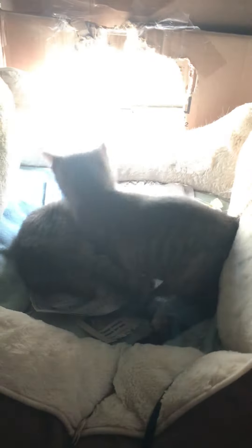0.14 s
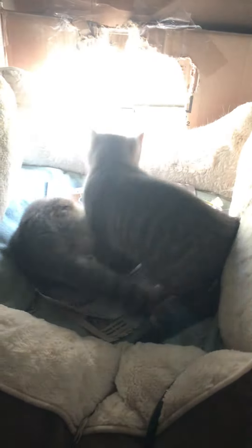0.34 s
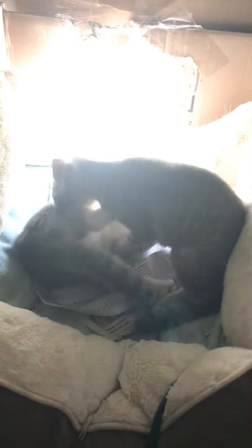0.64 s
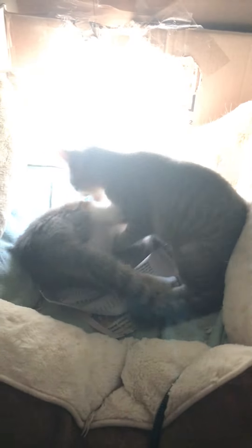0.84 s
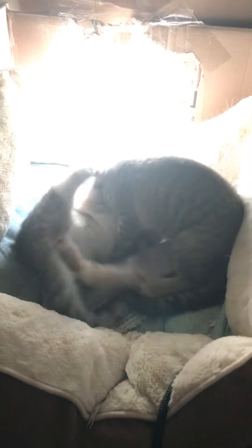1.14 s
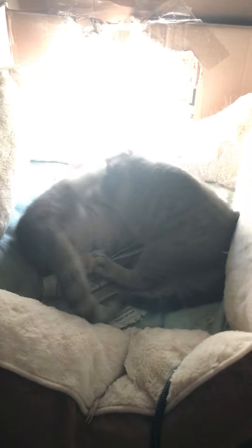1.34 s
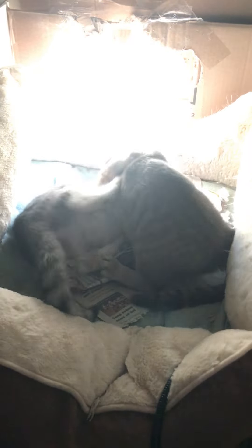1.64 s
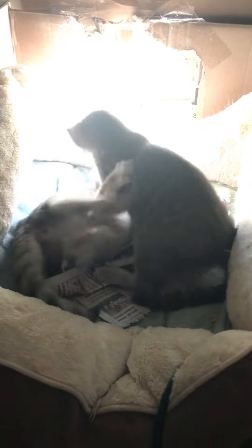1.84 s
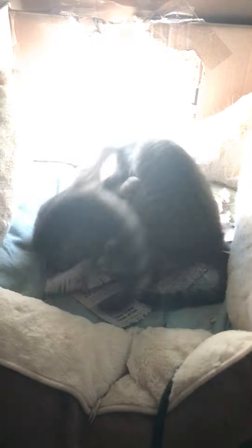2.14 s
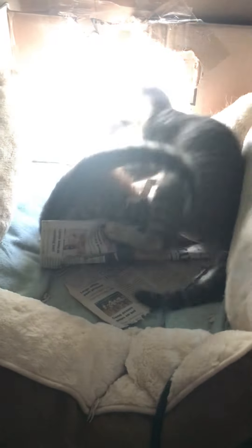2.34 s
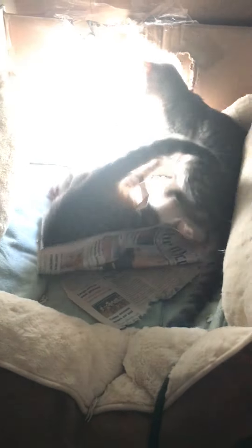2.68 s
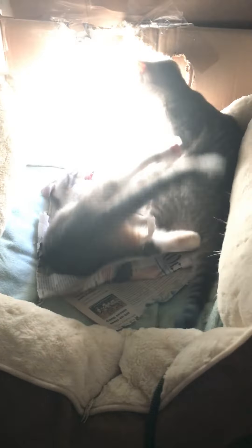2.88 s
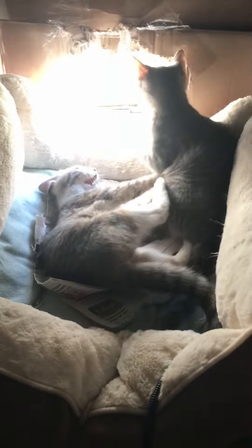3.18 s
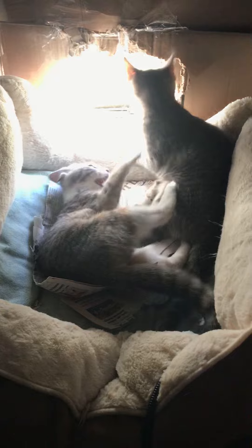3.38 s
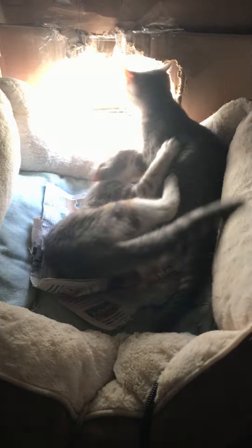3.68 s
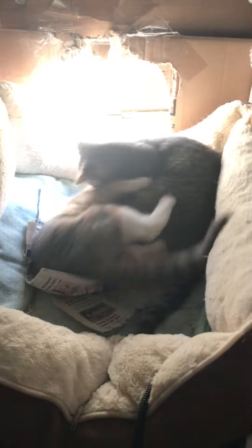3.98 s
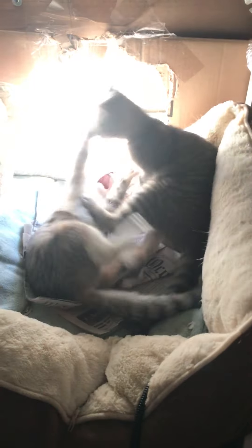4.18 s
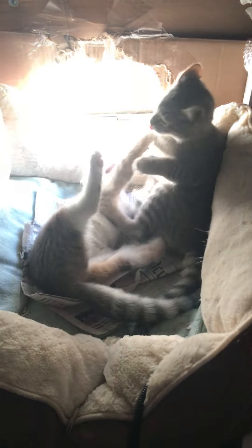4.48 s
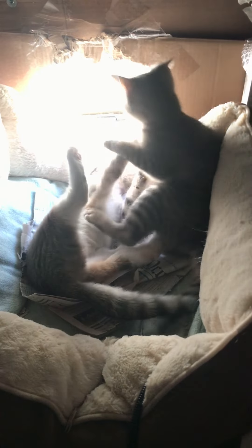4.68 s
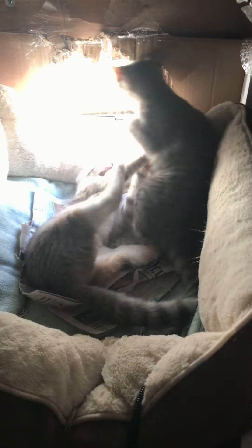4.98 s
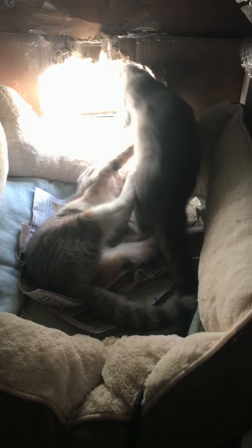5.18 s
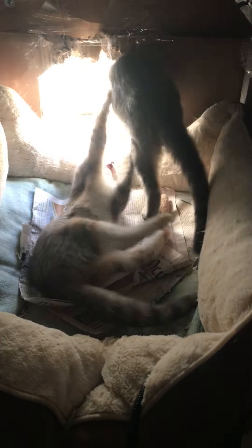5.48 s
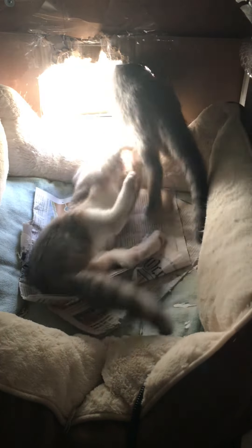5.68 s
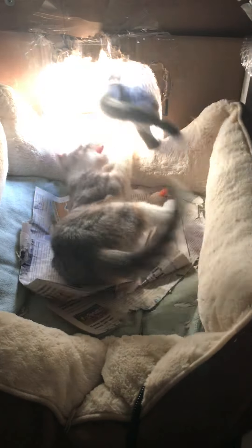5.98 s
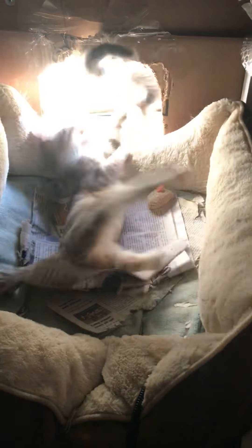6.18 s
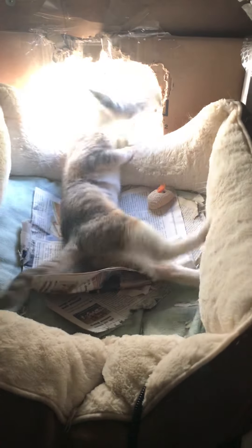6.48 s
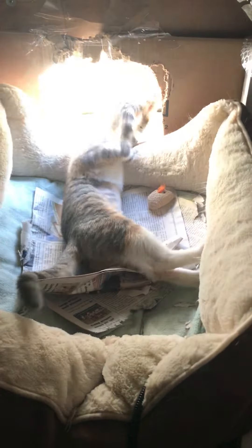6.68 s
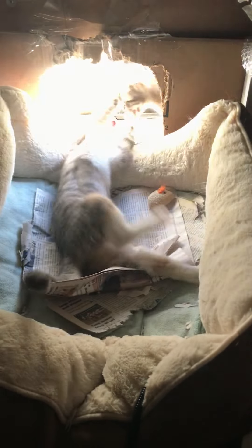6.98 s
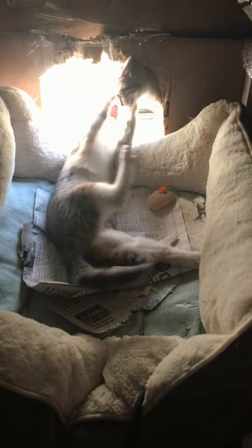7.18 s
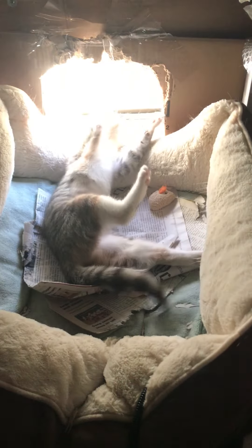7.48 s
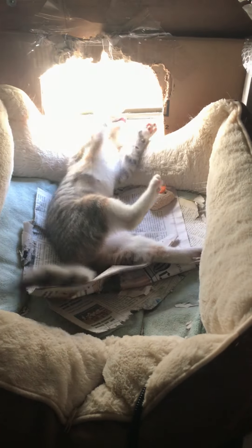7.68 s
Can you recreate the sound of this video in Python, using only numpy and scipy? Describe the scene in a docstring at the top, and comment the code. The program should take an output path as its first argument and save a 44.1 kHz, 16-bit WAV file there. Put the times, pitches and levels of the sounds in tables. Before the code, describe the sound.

Two kittens wrestle on newspaper in a padded cardboard box, sounding close and dry over a faint, steady low machine hum. From the start, paper rustles and fur brushes in uneven bursts with small claw snaps, and a soft thump comes near 1 second. From about 1.1 to 2 seconds one kitten gives a single hoarse, wavering yowl that climbs in pitch and grows brighter toward its end. Sharp paper snaps cluster around it, the loudest at about 2.1 seconds, with another strong one near 3. Lighter scuffling continues, easing around 4.5 seconds, with a soft bump at 4.8 and a snap just after 5. A brisk flurry of rubbing and crackling peaks around 6.2 seconds. From 6.4 to 7.6 seconds come several dull thumps and knocks on the cardboard, amid fading rustles.

```python
"""Paper rustles and snaps over a low hum: two kittens wrestle on newspaper in a padded bed inside a
cardboard box. One gives a hoarse yowl about a second in, its throat and mouth boosting a stack of tones.
Fur and paper rub in thousands of tiny clicks, claws set the sheet ringing in short snaps, and bodies
thump the cardboard, mostly near the end. A machine hums somewhere in the house throughout."""
import sys
import numpy as np
from scipy import signal
from scipy.fft import rfft, irfft, next_fast_len
from scipy.io import wavfile

SR = 44100
rng = np.random.default_rng(int(sys.argv[2]) if len(sys.argv) > 2 else 0)


def wrap_up_sound(samples):
    """Save the sound to the file named by the first command line argument, as 16-bit audio."""
    columns = np.atleast_2d(samples).T
    # keep every value between -1 and 1, then stretch to whole-number steps
    tamed = np.clip(columns, -1, 1)
    steps = np.round(tamed * 32767).astype(np.int16)
    wavfile.write(sys.argv[1], SR, steps)


N = 345303

# Tone colour of the room's rumble, of rubbed paper and of rubbed fur: pitch_hz, relative_db
ROOM_COLOUR = [(18, -30), (30, -32), (64, -3), (124, -2.5), (179, -13.5), (210, -12), (245, -6.5),
               (426, -18), (1190, -21), (1280, -25.5), (1590, -26), (2290, -34), (16000, -44.5)]
PAPER_COLOUR = [(450, -13), (900, 7.5), (1300, 4.5), (2200, 0), (3500, -5), (5000, -26), (8000, -56),
                (16000, -16.5)]
FUR_COLOUR = [(1500, -5.5), (3000, -0.5), (6300, 0), (8700, -1), (12500, -1), (15500, -5)]
# Tones of the machine: pitch_hz, width_hz, level_db
HUM_TONES = [(81.7, 100, -61), (118.9, 7.8, -60), (179.1, 18.5, -65), (238.7, 7.8, -66), (590.6, 35, -72),
             (996, 7.8, -78)]
# Bodies sliding on paper and plush: peak_s, length_s, paper_db, fur_db
SCUFFLE_MOVES = [(0.1, 0.066, -59, -61), (0.171, .03, -53.5, -61.5), (0.242, 0.065, -62, -65.5),
                 (0.344, 0.041, -55, -60.5), (0.528, 0.15, -67, -68), (.65, 0.098, -66, -67),
                 (0.735, 0.057, -61, -64), (0.986, 0.037, -57, -78), (1.042, 0.041, -58.5, -70),
                 (1.195, 0.05, -49.5, -54), (1.308, 0.17, -54, -56), (1.585, 0.12, -58, -62),
                 (1.834, 0.016, -58, -46), (1.909, 0.15, -51, -54), (2.061, 0.058, -50, -51),
                 (2.182, 0.077, -54, -55), (2.28, 0.48, -58, -58.5), (2.478, 0.25, -57, -55),
                 (2.676, 0.087, -57.5, -57), (2.778, 0.037, -64, -61), (2.881, 0.067, -55.5, -57.5),
                 (2.967, 0.11, -56.5, -62), (3.062, .12, -59.5, -59), (3.47, 0.3, -65.5, -70),
                 (3.735, 0.16, -64.5, -67), (3.934, .07, -54.5, -55), (4.052, 0.063, -59.5, -54),
                 (4.106, 0.085, -55, -56), (4.234, 0.18, -67, -63), (4.4, 0.11, -79, -63),
                 (4.891, 0.064, -80, -62.5), (5.051, 0.012, -71, -51.5), (5.19, 0.064, -60.5, -55),
                 (5.378, 0.16, -66.5, -59.5), (5.49, 0.22, -81, -64), (5.601, 0.08, -60, -62.5),
                 (5.85, 0.11, -61.5, -57), (5.933, 0.095, -65, -58), (6.089, 0.053, -58.5, -52.5),
                 (6.174, .04, -48.5, -49), (6.201, 0.037, -44.5, -40.5), (6.251, 0.046, -49.5, -41.5),
                 (6.438, 0.065, -66, -58.5), (6.813, 0.15, -62, -63), (6.535, 0.075, -77, -65),
                 (6.665, 0.042, -79, -67), (6.991, 0.099, -62, -64.5), (7.076, .08, -64.5, -62),
                 (7.196, 0.11, -72, -62.5), (7.316, 0.13, -68, -63.5), (7.446, 0.077, -63, -60.5),
                 (7.522, 0.037, -83, -62.5), (7.735, .1, -82, -70)]
# Tones the cardboard and the paper ring at: pitch_hz, relative_db, ring_s (time to fade by 60 dB)
CARDBOARD_TONES = [(60, 0, 0.38), (108, 7, 0.1), (164, -3.5, 0.12), (226, 7, 0.13), (302, 15, 0.044),
                   (430, 9.5, 0.11), (615, -18, 0.033)]
SHEET_TONES = [(606, -6.5, 0.017), (1228, -15.5, 0.034), (1500, -5.5, 0.0047), (2430, -13.5, 0.0077),
               (2810, 1, 0.0027), (4020, -0.5, 0.0033), (5770, 7.5, 0.00075), (8740, -1.5, 0.0013),
               (11450, 3, 0.0016), (14300, -33, 0.0027)]
# Blows on the cardboard: start_s, peak_db, boom_db (low tones), knock_db (high tones), length_ms
THUMP_HITS = [(0.971, -44, -20, -5.5, 0.99), (4.798, -44, -8, -1, 1.8), (6.416, -40.5, -1, -12, 0.85),
              (6.448, -38.5, 3.5, -13, 0.46), (6.752, -30.5, -13, -22, 2.7), (6.802, -32.5, -1, -0.5, 1.3),
              (6.997, -35, -9, -5.5, 0.84), (7.068, -41, 1, -7, 1.3), (7.239, -44.5, -7, -5, 0.44),
              (7.279, -41, -1, -10, 3.5), (7.415, -39.5, -9, -7, 0.32), (7.64, -35, -34, -4, 5.7)]
# Snaps of claws and paper: start_s, peak_db, dull_db (low tones), treble_db (high tones)
SNAP_HITS = [(0.1487, -43, 26, -23), (.1735, -36, 15, -22), (0.2236, -39.5, 5, -20), (.2443, -34, 11, -43),
             (0.3116, -44, 12, -24), (0.3516, -32.5, 13, -38), (0.366, -40.5, 8, -24), (.541, -45, 12, -24),
             (.719, -37, 9, -26), (1.0275, -34, -6, -23), (1.1695, -36, 6, -20), (1.228, -36, -13, -33),
             (1.2494, -30, -11, -42), (1.282, -29, 8, -19), (1.296, -28, 18, -29), (1.3249, -28.5, -23, 10),
             (1.8848, -26, -14, 3), (1.8981, -16, -1.5, -42), (2.0546, -27.5, 16.5, 4),
             (2.0727, -32, -4, -13), (2.0857, -23, -13, -29), (2.1495, -5, 8, 12.5), (2.1624, -33, 17, -19),
             (2.2157, -34, 31, -14), (2.2754, -38.5, 27, -23), (2.318, -35.5, -2, -7),
             (2.3412, -39, 17, -23), (2.5504, -42.5, -24, -16), (2.6791, -40.5, -11, -45),
             (2.7182, -40.5, -1, -45), (2.811, -39.5, 7, -53), (2.945, -34, 3, -27),
             (2.9502, -11.5, -2, -29), (3.045, -40, 6, -34), (3.073, -28, 11.5, -21),
             (3.3128, -38, 13.5, -40), (3.441, -38.5, 5, -45), (3.7231, -32.5, -22, -28),
             (3.959, -39, -23, -26), (4.0874, -37, 2, -28), (4.1404, -30, -41, -27), (4.1644, -34, 15, -35),
             (5.0602, -30.5, 16.5, 9.5), (5.142, -42, 2, -26), (5.364, -37.5, 3, -9),
             (5.4037, -35, -23, -20), (5.721, -43.5, 14, -21), (5.768, -40.5, -17, -26),
             (5.807, -33, 4, -60), (5.8303, -33.5, -32, -54), (5.9716, -32.5, 13, -25),
             (6.0083, -42, 19, -27), (6.0846, -33, -26, -8), (6.096, -21.5, -39, -22),
             (6.2076, -15.5, -22, 5), (6.2377, -22, -30, -9), (6.25, -15.5, -36, -17),
             (6.2734, -33, 17.5, -4), (6.346, -34.5, -26, 7), (7.3639, -40, -12, -30),
             (7.4532, -37, -18, 32)]
# Path of the voice: time_s, pitch_hz, chest_db, mouth_db, throat_db, throat_hz
YOWL_PATH = [(1.07, 322, -75, -64, -76, 2390), (1.09, 351.3, -47, -76, -93, 2380),
             (1.114, 337.5, -47.5, -64, -79.5, 2380), (1.132, 343.3, -55, -81, -92, 2230),
             (1.158, 391.7, -61, -59.5, -68, 2300), (1.19, 362, -46, -59, -65, 2230),
             (1.248, 385.8, -56, -57.5, -57, 2470), (1.264, 423, -65, -65, -65, 2470),
             (1.3, 416, -55, -51, -52, 2470), (1.324, 468, -62, -59, -52, 2570),
             (1.432, 467.4, -60, -57, -51, 2660), (1.49, 513, -56, -51.5, -53.5, 2600),
             (1.538, 462, -54, -55.5, -50, 2730), (1.58, 394.3, -43, -51, -54.5, 2350),
             (1.628, 425.6, -56, -62, -68, 2280), (1.656, 428.4, -59, -58, -62, 2300),
             (1.68, 467.5, -54, -55, -60, 2350), (1.718, 413, -47, -48.5, -65, 2050),
             (1.758, 443, -58, -54, -62, 2104), (1.818, 463, -58, -42.5, -32.5, 2690),
             (1.87, 443, -68, -49, -42, 2620), (1.894, 464, -58, -46, -37, 2350),
             (1.93, 475, -69, -56, -39, 2270), (1.982, 423.3, -59, -48, -57, 2280),
             (2.0, 447, -59, -60, -60, 2236), (2.02, 438, -61, -51, -60, 2310)]
# Roughness of the voice: time_s, hoarseness (0 to 1)
HOARSENESS = [(1.07, .3), (1.13, .4), (1.17, .9), (1.29, .8), (1.33, .3), (1.56, .3), (1.66, .45),
              (1.75, .2), (1.95, .2), (2.02, .6)]
# Pitches the microphone port weakens: pitch_hz, width_hz, share_removed (0 to 1)
PORT_DIPS = [(4880, 410, 0.36), (7700, 200, 0.26), (10420, 1000, 0.44)]


def from_db(db):
    """Turn decibels into a number to multiply by."""
    return 10 ** (np.asarray(db) / 20)


def rms_one(x):
    """Scale a sound so its average strength (rms) is 1."""
    return x / np.sqrt(np.mean(x ** 2) + 1e-20)


def in_time(rows):
    """Turn rows that start with a time into curves, one value a sample."""
    times_s, *columns = np.transpose(rows)
    return [np.interp(np.arange(N) / SR, times_s, column) for column in columns]


def coloured(x, colour):
    """Give a sound a tone colour, at strength 1."""
    size = next_fast_len(N)
    hz, db = np.transpose(colour)
    log_hz = np.log(np.arange(size // 2 + 1) * SR / size + 1)
    gains = from_db(np.interp(log_hz, np.log(hz), db))
    return rms_one(irfft(rfft(x, size) * gains, size)[:N])


def drift(rate_hz, size=N):
    """A smooth random wobble of strength 1."""
    r = np.exp(-2 * np.pi * rate_hz / SR)
    noise = rng.standard_normal(size + SR // 4)
    return rms_one(signal.lfilter([1], [1, -2 * r, r * r], noise)[SR // 4:])


def ring(force, hz, ring_s):
    """Each push starts a pure tone that dies away."""
    decay, turn = from_db(-60 / (ring_s * SR)), 2 * np.pi * hz / SR
    return signal.lfilter([0, np.sin(turn)], [1, -2 * decay * np.cos(turn), decay ** 2], force + 1e-18)


def add(out, start_s, peak_db, blow):
    """Mix in one blow at its time and peak level."""
    at = round(start_s * SR)
    out[at:at + len(blow)] += (from_db(peak_db) * blow / np.abs(blow).max())[:N - at]


def room_rumble(level_db=-57):
    """The steady low noise of the house."""
    return from_db(level_db) * coloured(rng.standard_normal(N), ROOM_COLOUR)


def machine_hum():
    """A machine holds a few tones, each blurred by a random waver."""
    out, t = 0, np.arange(N) / SR
    for hz, width_hz, db in HUM_TONES:
        waver = 1 + drift(width_hz) + 1j * drift(width_hz)
        out = out + from_db(db) * rms_one(np.real(waver * np.exp(2j * np.pi * hz * t)))
    return out


def box_echo(x, ring_s=0.068, level_db=-14.5):
    """Close padded walls give a short, dull tail of echoes."""
    t = np.arange(round(.2 * SR)) / SR
    dull_noise = signal.lfilter([1], [1, -.6], rng.standard_normal(len(t)))
    tail = dull_noise * from_db(-60 * t / ring_s) * (t > .003)
    return from_db(level_db) * signal.fftconvolve(x, tail / np.sqrt(np.sum(tail ** 2)))[:N]


def scuffle_levels(fade_db=11, rest_paper_db=-74, rest_fur_db=-103):
    """Each scuffle swells and fades; the loudest leads, with faint stirring in between."""
    t = np.arange(0, N / SR + .002, .002)
    peak_s, length_s, paper_db, fur_db = np.transpose(SCUFFLE_MOVES)[:, :, None]
    drop_db = fade_db * (np.abs(t - peak_s) / length_s) ** 0.97
    paper = np.maximum((paper_db - drop_db).max(axis=0), rest_paper_db)
    fur = np.maximum((fur_db - drop_db).max(axis=0), rest_fur_db)
    return in_time(np.transpose([t, paper, fur]))


def grains(per_s, spread_db, clump_db):
    """Tiny random clicks of uneven size that come in clumps."""
    sizes = from_db(spread_db * np.minimum(rng.exponential(1, N), 5)) * rng.choice([-1, 1], N)
    return sizes * (rng.random(N) < per_s / SR) * from_db(clump_db * drift(34))


def patchy(x, count, swing_db, low_hz, high_hz):
    """Pitch ranges swell and fade separately, as different hairs and folds rub."""
    edges = np.geomspace(low_hz, high_hz, count + 1)
    bands = [signal.butter(1, pair, "band", fs=SR, output="sos") for pair in zip(edges, edges[1:])]
    return sum(from_db(swing_db * drift(27)) * signal.sosfilt(band, x) for band in bands)


def crinkles(paper_db):
    """Small creases pop, more often when the paper moves; each rings one tone of the sheet."""
    per_s = 60 * np.clip((paper_db + 76) / 15, 0, 1.5)
    pops = rng.standard_normal(N) * (rng.random(N) < per_s / SR)
    chosen = rng.integers(0, len(SHEET_TONES), N)
    ringing = sum(from_db(db) * ring(pops * (chosen == k), hz, ring_s / 2)
                  for k, (hz, db, ring_s) in enumerate(SHEET_TONES))
    return from_db(np.minimum(paper_db, -58) + 11.5) * ringing


def rubbing():
    """Paper crackles in coarse grains; fur brushes the plush in fine ones."""
    paper_db, fur_db = scuffle_levels()
    paper = coloured(grains(per_s=4000, spread_db=2, clump_db=2.6), PAPER_COLOUR)
    fur = coloured(grains(per_s=13000, spread_db=2, clump_db=2), FUR_COLOUR)
    fur = rms_one(patchy(fur, count=5, swing_db=1.5, low_hz=1930, high_hz=18300))
    return from_db(paper_db) * paper + crinkles(paper_db) + from_db(fur_db) * fur


def thumps():
    """A soft paw or flank rings the cardboard; each blow has its own mix of low boom and higher knock."""
    out, ms = np.zeros(N), np.arange(12000) * 1000 / SR
    for start_s, peak_db, boom_db, knock_db, length_ms in THUMP_HITS:
        push = np.diff(ms * np.exp(-2 * ms / length_ms), prepend=0)
        thump = 0
        for hz, db, ring_s in CARDBOARD_TONES:
            boost_db = boom_db if hz < 130 else knock_db if hz > 290 else 0
            chance_db = 2 * rng.standard_normal()
            thump = thump + from_db(db + boost_db + chance_db) / hz * ring(push, hz, ring_s)
        add(out, start_s, peak_db, thump)
    return out


def snaps():
    """A quick run of cracks sets the sheet ringing; brighter snaps have shorter runs."""
    out, ms = np.zeros(N), np.arange(900) * 1000 / SR
    log_hz = np.log(np.array(SHEET_TONES)[:, 0])
    thin_sheet = signal.butter(2, 680, "high", fs=SR, output="sos")   # thin paper gives little bass
    for start_s, peak_db, dull_db, treble_db in SNAP_HITS:
        sharpness = 1.5 + 2 ** ((treble_db + 10) / 10.5)
        progress = 1.5 * sharpness * ms
        cracks = rng.standard_normal(len(ms)) * progress * np.exp(-progress)
        force = signal.sosfilt(thin_sheet, cracks)
        corners_db = [1.3 * dull_db - 5, dull_db, -6, treble_db]
        boosts_db = np.interp(log_hz, np.log([650, 1400, 3000, 9000]), corners_db)
        snap = sum(from_db(db + boost_db) * rms_one(ring(force, hz, ring_s))
                   for (hz, db, ring_s), boost_db in zip(SHEET_TONES, boosts_db))
        add(out, start_s, peak_db, signal.sosfilt(thin_sheet, snap))
    return out


def yowl():
    """Chest, mouth and throat boost the voice's tones near their own; hoarseness shakes pitch and level."""
    start_s, end_s = YOWL_PATH[0][0], YOWL_PATH[-1][0]
    fade, = in_time([(start_s, 0), (start_s + .024, 1), (end_s - .03, 1), (end_s, 0)])
    live = fade > 0
    curves = in_time(YOWL_PATH) + in_time(HOARSENESS)
    pitch_hz, chest_db, mouth_db, throat_db, throat_hz, hoarse = [curve[live] for curve in curves]
    size = len(hoarse)
    shaky_hz = pitch_hz * (1 + .05 * hoarse * drift(120, size))
    phase = 2 * np.pi * np.cumsum(shaky_hz) / SR
    rasp_db = -44 + 1.7 * (throat_db + 28.5)   # the upper throat rasps when the throat rings loudly
    # centre_hz, width_hz, level_db
    boosts = [(522, 250, chest_db), (1690, 880, mouth_db),
              (throat_hz, 660, throat_db), (4400, 1200, rasp_db)]
    out = np.zeros(N)
    for k in range(1, 14):
        # complex numbers also delay each tone, so every pulse of the voice rings out
        gain = sum(from_db(db) / (1 + 2j * (k * pitch_hz - hz) / width) ** 2 for hz, width, db in boosts)
        flutter = from_db(8 * hoarse * drift(50, size))
        breath = .2 * drift(300, size)   # swirling air fills the gaps between the tones
        out[live] += (flutter + breath) * np.real(gain * np.exp(1j * k * phase))
    return np.sqrt(2) * fade * out


def scene():
    """The kittens in their box over the sound of the house."""
    kittens = yowl() + snaps() + thumps()
    house = room_rumble() + machine_hum()
    return (kittens + box_echo(kittens) + rubbing() + house)[None]


def record(dry):
    """The microphone port weakens a few pitches, and the highest treble is cut."""
    for hz, width_hz, share in PORT_DIPS:
        dry = dry - share * signal.lfilter(*signal.iirpeak(hz, hz / width_hz, fs=SR), dry)
    return signal.sosfilt(signal.cheby2(16, 60, 16330, fs=SR, output="sos"), dry)


dry = scene()
out = record(dry)
wrap_up_sound(out)
```